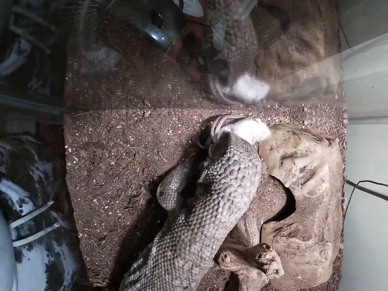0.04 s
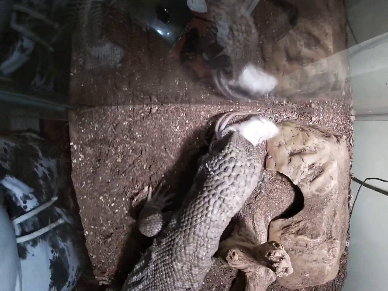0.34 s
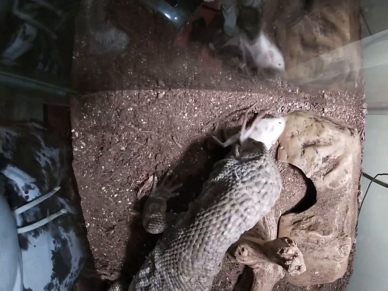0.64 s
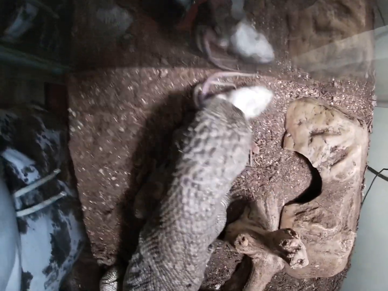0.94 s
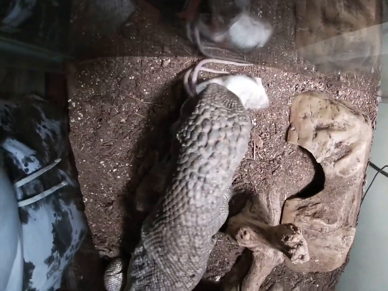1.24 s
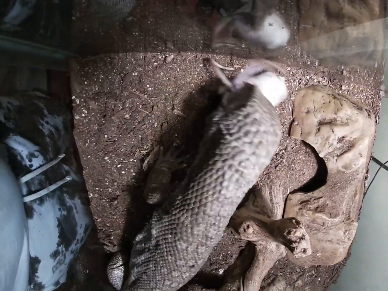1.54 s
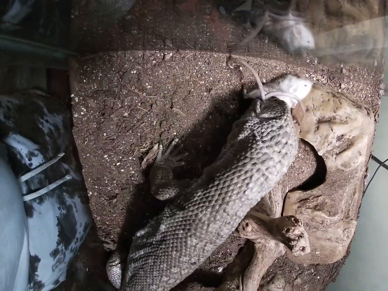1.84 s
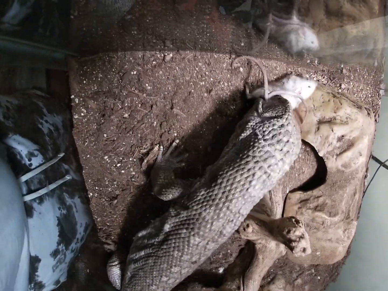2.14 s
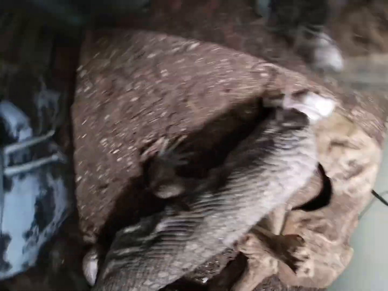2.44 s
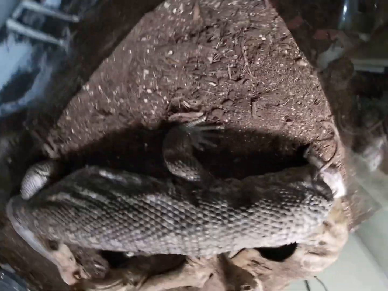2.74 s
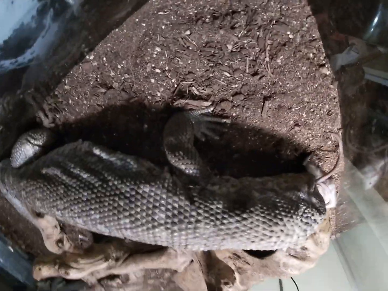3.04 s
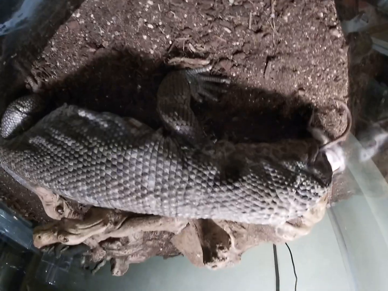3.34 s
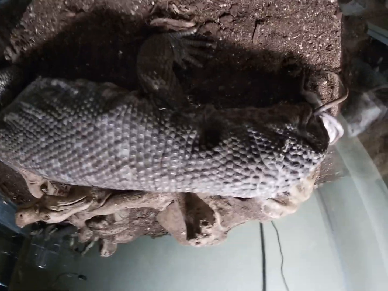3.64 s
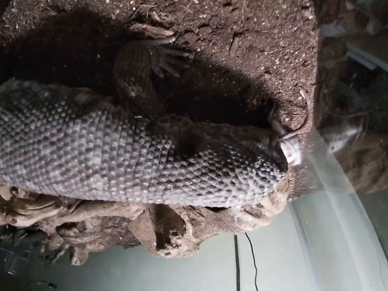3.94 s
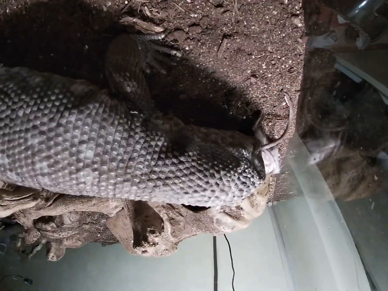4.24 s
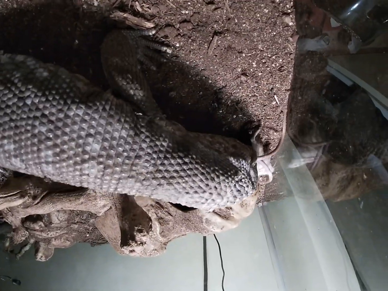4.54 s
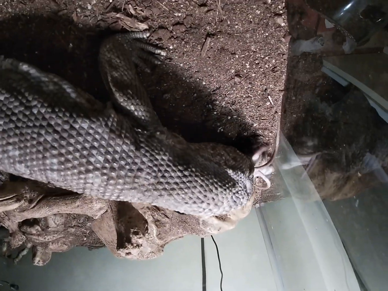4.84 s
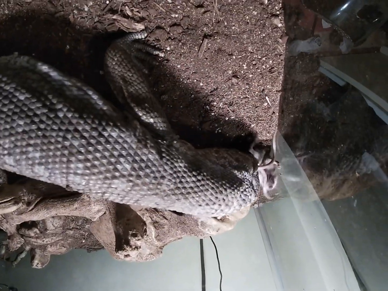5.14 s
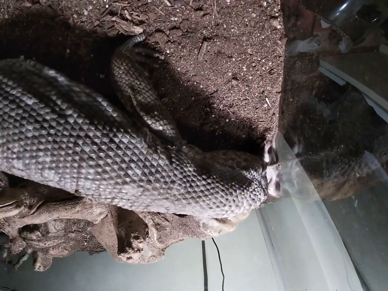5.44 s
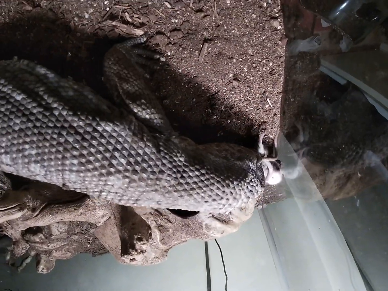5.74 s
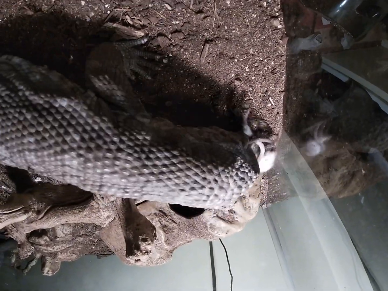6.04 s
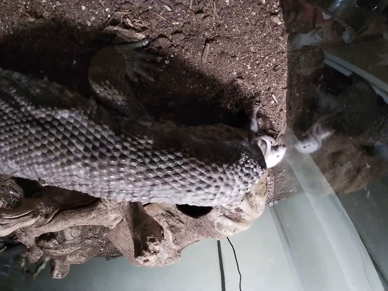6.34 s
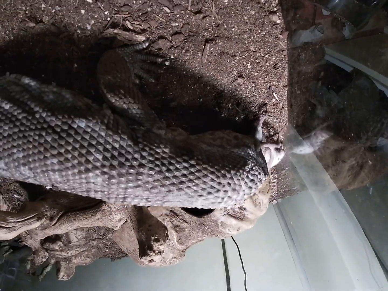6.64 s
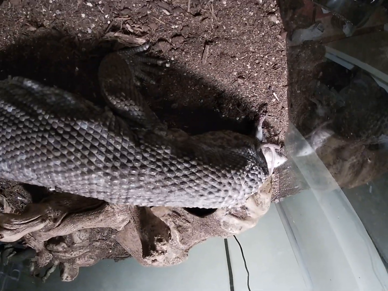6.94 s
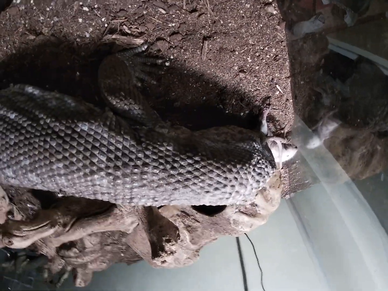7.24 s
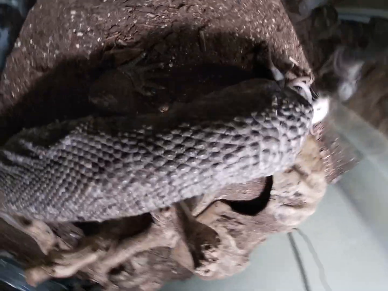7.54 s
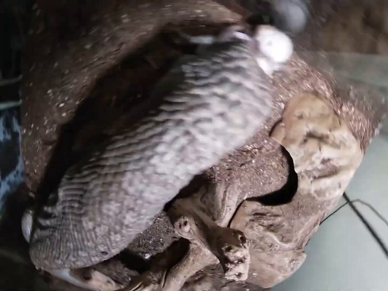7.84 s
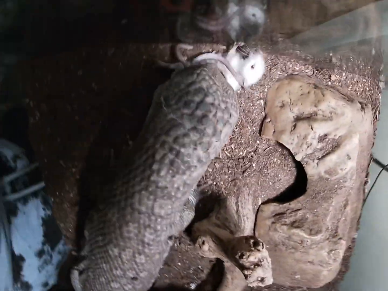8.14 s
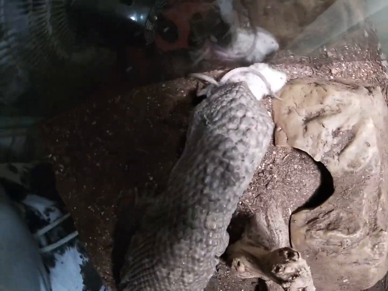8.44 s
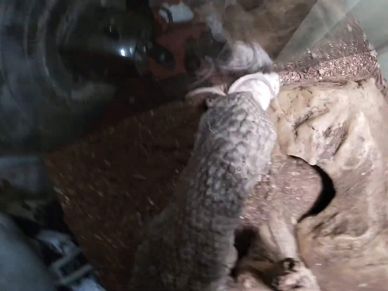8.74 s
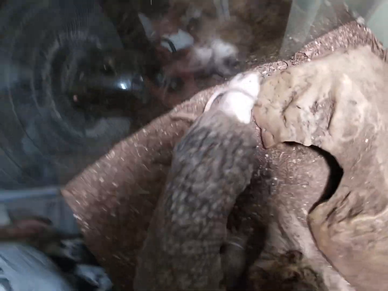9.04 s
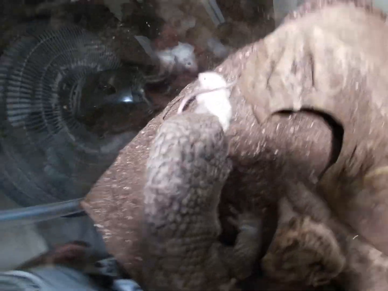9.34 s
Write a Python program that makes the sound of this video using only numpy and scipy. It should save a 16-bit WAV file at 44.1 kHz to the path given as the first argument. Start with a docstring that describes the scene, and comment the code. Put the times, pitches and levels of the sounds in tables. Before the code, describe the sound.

A mouse squeals in short, raspy bursts while a lizard scuffs over grit and knocks against a hollow glass tank, with microphone bumps.

```python
"""A mouse squeals nine times, in three bouts, held by a large lizard in a glass tank in a small hard room.
Each squeal starts as a soft whimper, then shoots up in pitch and breaks into a rasp.
The lizard shuffles over gritty soil and knocks against the hollow tank, which booms.
Fingers bump and rub a hand-held phone close to its microphone, over the faint noise of the room."""
import sys
import numpy as np
from scipy import signal
from scipy.fft import rfft, irfft, next_fast_len
from scipy.io import wavfile
from scipy.ndimage import uniform_filter1d, minimum_filter1d

SR = 44100
rng = np.random.default_rng(int(sys.argv[2]) if len(sys.argv) > 2 else 0)


def to_wav(s):
    """Save 16-bit WAV."""
    ch = np.atleast_2d(s).T  # columns
    pcm = np.round(np.clip(ch, -1, 1) * 32767)  # PCM
    wavfile.write(sys.argv[1], SR, pcm.astype(np.int16))


N = 422478
TIME = np.arange(N) / SR

# The notes the hollow tank rings at. Each row: pitch in Hz, width in Hz, gain in dB.
TANK_NOTES = [(125, 26, -18), (168.5, 10.2, 7.5), (289, 46, -10.5), (407.6, 39, -10.5)]
# The tone of a scraping claw. Each row: frequency in Hz, gain in dB.
SCRAPE_TONE = [(120, -27), (350, 15), (700, 4), (1200, 6), (1800, 5.5), (3600, 1), (5000, -6.5), (9000, -3),
               (13000, -89)]
# The hiss of fine grit or sliding skin. Each row: frequency in Hz, gain in dB.
HISS_TONE = [(1000, -5), (2500, -1), (3900, -2), (4800, -5), (6200, -1.5), (7800, -8.5), (9200, -10),
             (10800, -27), (13000, -27), (15000, -45)]


def squeal(t, lead_s, cry_s, low_hz, top_hz, rough, half, tilt_db, opening, rasp_db, climb_s, tire_db):
    """A soft sagging whimper swells, then the mouse pushes: the pitch shoots up and the voice breaks."""
    # How the throat and mouth shape the voice. Each row: frequency in Hz, gain in dB.
    throat = [(700, -30), (1020, -29), (1220, -11), (1700, -11.5), (2100, -9.5), (2600, -4.5), (3250, -4),
              (4350, -4.5), (5150, -18), (6500, -15), (7600, -20), (8900, -16.5), (10300, -34),
              (11800, -46), (15000, -50)]
    # A piercing ring that the second harmonic sweeps through. Each row: Hz, width in Hz, gain in dB.
    piercing_note = [(3270, 320, 7.5)]
    break_s, rattle_hz, flutter_hz = 0.056, 410, 135
    since_push = t - lead_s
    crying_s = np.maximum(since_push, 0)
    whimper = (np.minimum(since_push, 0) / lead_s) ** 2
    push = 1 - np.exp(-(crying_s / climb_s) ** 1.4)
    # The voice starts husky, clears on the climb and breaks up near the top.
    broken = np.clip(since_push / break_s, 0, 1) ** 2
    harsh = rough * (rough + (1 - rough) * broken) + 0.44 * whimper
    hz = low_hz * (1 + 0.15 * whimper) + (top_hz - low_hz) * push
    hz *= 1 - 0.0388 * (crying_s / cry_s) ** 4  # the pitch gives way as the cry runs out
    hz *= 1 + 0.0575 * harsh * wander(t, 1100) + 0.022 * wander(t, 219.1)
    # A slower vibration in the throat shakes the vocal folds and smears every harmonic.
    shake = np.sin(phase_of(rattle_hz * (1 + 0.1977 * wander(t, 149.6))))
    phase = phase_of(hz) + 0.95 * rough * harsh * shake
    # A wider mouth lifts the resonances.
    mouth = [(f * opening, db + tilt_db * np.log2(f / 3000)) for f, db in throat]
    # Under strain every other cycle differs, which adds tones halfway between the harmonics.
    harmonic = np.arange(1, 21)[:, None] / 2
    strength = np.where(harmonic % 1, half * (1 + push) / 2, 1) * gain_at(harmonic * hz, mouth)
    # The folds close softly in the whimper, so its overtones are weak.
    soft_db = -14 * (1 - gate(since_push, 1, 0.028, .01)) - 10 * whimper
    strength *= undb(soft_db * np.log2(.5 + harmonic) / 2)
    voice = np.sum(strength * np.sin(harmonic * phase), axis=0)
    rasp = undb(rasp_db + soft_db) * harsh * colour(rng.standard_normal(len(t)), mouth) / 2
    flicker_db = 5.5 * np.minimum(harsh, .7) * np.tanh(wander(t, 327.6))
    level = undb(flicker_db + tire_db * crying_s / cry_s - 6 * whimper)
    flutter = 1 + 0.4 * broken * np.sin(phase_of(flutter_hz * (1 + 0.255 * wander(t, 95.9))))
    sound = (voice + rasp) * flutter * level * gate(t, lead_s + cry_s, 0.67 * lead_s, 0.058)
    # The narrow ring builds before the voice breaks; then the open mouth rings with the second harmonic.
    pierce = ring(sound * (1 - broken ** 2), piercing_note)
    shrill = ring(sound * broken, [(2 * top_hz, top_hz / 2, 2)])
    return unit(sound + (1 - half) * (pierce + shrill))


def mouse():
    """The mouse cries again and again, each time with its own pitch and roughness."""
    # Each row: start of the climb, whimper length and cry length in seconds, low and top pitch in Hz,
    # level in dB, roughness and half-pitch share from 0 to 1, brightness in dB per octave,
    # mouth opening as a factor, rasp in dB, climb time in seconds, level change over the cry in dB.
    squeals = [(5.135, 0.04, 0.11, 1456, 1740, -26, 0.65, 0.88, -2, 0.96, 4, 0.015, -7.5),
               (5.368, 0.053, 0.085, 1226, 2075, -26, 0.71, 0.05, 1, 0.94, 1.5, 0.034, -10),
               (5.602, 0.058, 0.099, 1298, 2396, -28.5, 0.58, 0, -1, 1, 0, 0.04, -7),
               (5.837, 0.052, 0.09, 1299, 2298, -28.5, 0.64, 0.43, -1, 1.037, 0.5, 0.037, -2.5),
               (6.442, 0.06, 0.087, 1320, 2110, -25.5, 0.55, 0.03, 0, 0.97, -0.5, 0.037, -3),
               (6.678, 0.053, 0.097, 1274, 2200, -25.5, 0.53, 0, 0.5, 0.98, -7.5, 0.037, -6.5),
               (7.356, 0.046, 0.092, 1268, 1763, -25.5, 0.47, 0.1, 0.5, 0.9, -7, 0.034, -6.5),
               (7.61, 0.061, 0.091, 1236, 2332, -29, 0.6, 0.25, 0, 1, -4, 0.038, -6),
               (7.86, 0.064, 0.097, 1324, 2112, -30.5, 0.34, 0.3, 1.5, 1.012, 2, 0.028, -13.5)]
    out = np.zeros(N)
    for s, lead_s, cry_s, low_hz, top_hz, db, *timbre in squeals:
        t = TIME[:int((lead_s + cry_s + .02) * SR)]
        add(out, s - lead_s, undb(db) * squeal(t, lead_s, cry_s, low_hz, top_hz, *timbre))
    return out


def shoving_and_swaying():
    """The lizard's shoves boom the tank and shake its stand; the swinging phone adds a low rumble."""
    # Each row: time of the hardest push and length in seconds, relative boom and shudder in dB.
    shoves = [(0.04, 0.072, -35, -38.5), (0.128, 0.16, -40.5, -42.5), (0.462, 0.15, -34.5, -40.5),
              (0.56, 0.087, -31.5, -56), (0.778, 0.13, -39, -67), (0.859, 0.085, -30.5, -40),
              (1.167, 0.043, -35.5, -42), (1.231, 0.1, -31, -34), (1.297, 0.11, -34.5, -34.5),
              (1.629, 0.055, -37, -39.5), (2.298, 0.057, -28, -22.5), (2.436, 0.077, -35, -36.5),
              (2.549, 0.019, -33, -29), (2.763, 0.38, -46.5, -42), (3.06, 0.34, -40.5, -50),
              (3.491, 0.04, -37.5, -36.5), (3.79, 0.16, -41, -55), (4.182, 0.037, -42, -63),
              (5.113, 0.048, -41.5, -39.5), (6.123, 0.27, -47.5, -59.5), (7.673, 0.16, -36, -38),
              (7.83, 0.14, -33, -28), (7.933, 0.043, -38, -26.5), (8.001, 0.069, -33, -30.5),
              (8.942, 0.04, -24.5, -34.5), (9.182, 0.25, -30.5, -35), (9.54, 0.06, -28, -29.5)]
    # The hand swings the phone. Each row: fastest moment and length in seconds, relative level in dB.
    swings = [(1.1, 0.59, -50), (2.42, 0.42, -45.5), (2.82, 0.11, -38), (3.08, 0.32, -33.5),
              (3.45, 0.34, -47), (3.95, 0.5, -48.5), (7.39, 0.12, -44), (7.87, 0.39, -41),
              (8.51, 0.043, -37.5), (9.03, 0.4, -38.5), (9.52, 0.46, -35)]
    # The tone of the phone's rumble. Each row: frequency in Hz, gain in dB.
    rumble_tone = [(12, 5.5), (27, 5), (50, -6.5), (90, -5), (135, -12), (250, -25.5), (600, -61)]
    # The low note of the stand. Each row: pitch in Hz, width in Hz, gain in dB.
    stand_note = [(80.6, 27, 0)]
    fidget = undb(6 * np.tanh(wander(TIME, 15)))  # lizard and hand are never quite still
    boom_level = swells([(s, length, db) for s, length, db, _ in shoves]) + undb(-68.5) * fidget
    shudder_level = swells([(s, length, db) for s, length, _, db in shoves])
    sway_level = swells(swings) + undb(-67) * fidget
    rumble = steady(colour(rng.standard_normal(N), rumble_tone))
    sway = rumble * sway_level * undb(1 + 5.5 * wander(TIME, 25))
    pushes = colour(grains(400, 0.96), [(40, 15.0), (120, 2.5), (400, -12.5), (900, -15.5), (3000, -81)])
    boom = steady(ring(pushes, TANK_NOTES))
    shudder = steady(ring(ring(grains(400, 0.42), stand_note), stand_note))
    return sway + undb(-1) * (boom * boom_level + shudder * shudder_level)


def knocking(bite_s=0.00398):
    """A claw taps a hollow spot and scrapes briefly; its push rings the tank."""
    # Each row: time in seconds, relative scrape level in dB, scrape fade time in seconds,
    # frequency in Hz above which the scrape is dulled, relative boom in dB, hollow pitch in Hz.
    knocks = [(0.019, -34.5, .008, 5970, -45, 950), (0.934, -34, 0.009, 3980, -37.5, 940),
              (1.218, -30, 0.008, 5960, -38, 1340), (1.261, -30.5, 0.0065, 5000, -40, 1310),
              (1.294, -24.5, 0.0066, 1600, -31, 1090), (1.397, -35, 0.008, 8000, -38.5, 1320),
              (1.594, -29, 0.0075, 7100, -34.5, 1760), (2.593, -26, 0.0047, 5000, -35.5, 1090),
              (5.096, -32, 0.0078, 6000, -40.5, 2300), (7.799, -32.5, 0.021, 1200, -30.5, 670),
              (8.918, -16.5, 0.01, 3700, -25.5, 1670), (9.071, -34.5, 0.028, 900, -25, 800),
              (9.123, -32, 0.018, 2000, -21.5, 1330), (9.298, -29.5, 0.014, 1890, -22, 600)]
    scrapes, booms, t = np.zeros(N), np.zeros(N), TIME[:SR // 4]
    boom = ring(t * np.exp(-t / 0.002), TANK_NOTES)
    boom /= np.abs(boom).max()
    for s, db, fade_s, dull_hz, boom_db, hz in knocks:
        scrape = colour(rng.standard_normal(len(t)), SCRAPE_TONE)
        scrape = signal.lfilter(*signal.butter(2, dull_hz, fs=SR), scrape)
        scrape = unit(scrape + ring(scrape, [(hz, hz * 0.072, 7)])) * np.exp(-t / fade_s)
        tap = np.sin(2 * np.pi * hz * t) * np.exp(-t * hz / 2)
        add(scrapes, s - bite_s / 2, undb(db - 6) * scrape * gate(t, 1, bite_s, .01))
        add(booms, s, undb(db - 10) * tap + undb(boom_db + 4) * boom)
    return echoes(scrapes, glass_db=-15, glass_s=0.11, room_db=-9, room_s=0.13) + booms


def dragging():
    """Scales catch and slip on the soil in scuffs of changing tone; fine grit trickles."""
    # Each row: fastest moment and length in seconds, relative scuff and fine grit levels in dB.
    drags = [(0.064, 0.3, -52, -83), (0.466, 0.39, -50.5, -59), (1.014, 0.55, -51.5, -56.5),
             (1.66, 0.29, -58.5, -61), (2.277, 0.14, -45, -66), (2.441, 0.13, -61, -45),
             (2.561, 0.049, -42.5, -48), (2.683, 0.16, -50.5, -52.5), (2.864, 0.48, -54, -63),
             (3.134, 0.18, -45, -50.5), (4.36, 0.51, -64, -70), (5.047, 0.34, -60.5, -61.5),
             (7.087, 0.14, -63, -60), (7.315, 0.17, -56.5, -54), (8.38, 0.29, -63.5, -62.5),
             (8.855, 0.54, -59, -61), (9.157, 0.16, -51.5, -54.5), (9.57, 0.19, -54, -49.5)]
    # The tone of a scuff. Each row: frequency in Hz, gain in dB.
    scuff_tone = [(120, 0), (300, 11.5), (600, 1), (1200, 3.5), (2000, 0), (3500, -6), (5000, -25.5),
                  (9000, -52)]
    catch = undb(1.5 * wander(TIME, 35))
    scuff = shifting_tone(colour(grains(1500, 1.15), scuff_tone), depth_db=0.5, rate=22)
    grit = colour(grains(9000, 0.78), HISS_TONE)
    scuff_level = swells([(s, length, db) for s, length, db, _ in drags])
    grit_level = swells([(s, length, db) for s, length, _, db in drags]) + undb(-88)
    return catch * (scuff * scuff_level + undb(-1) * grit * grit_level)


def sweeping():
    """The lizard's side slides over the soil with a dull swish; long slides start gently."""
    # Each row: start and length in seconds, centre frequency in Hz, level in dB.
    sweeps = [(0.34, 0.07, 313, -47), (0.566, 0.14, 2270, -61.5), (2.081, 0.073, 1490, -48.5),
              (2.147, 0.082, 1530, -45.5), (2.388, .1, 980, -51), (2.659, 0.285, 2140, -58.5),
              (3.12, 0.089, 975, -43), (5.091, 0.074, 284, -48), (6.016, 0.17, 396, -56),
              (7.062, 0.2, 1120, -58), (9.398, 0.032, 3120, -54)]
    out = np.zeros(N)
    for s, length, hz, db in sweeps:
        t = TIME[:int((length + .04) * SR)]
        band = ring(rng.standard_normal(len(t)), [(hz, hz * 0.43, 0)])
        swish = unit(ring(band, [(hz, 2 * hz, 0)]))
        add(out, s, swish * undb(db + 1.1 * wander(t, 61.5)) * gate(t, length, length / 10, 0.014))
    return out


def scratching(hz=2100):
    """A claw ploughs a few grains, each time with a slightly different ring."""
    # Each row: start in seconds, level at its loudest in dB, seconds to get there.
    scratches = [(0.061, -51, 0.0024), (0.093, -51.5, 0.0058), (0.335, -51, 0.0045), (0.423, -47.5, .004),
                 (0.473, -50, 0.0026), (0.492, -49.5, 0.0026), (0.548, -47, 0.0024), (1.177, -47, 0.0053),
                 (2.105, -38.5, 0.0016), (2.155, -40, 0.0038), (2.237, -41, 0.0045), (3.499, -54, 0.0066),
                 (3.69, -54.5, 0.007), (3.725, -50, 0.0095), (3.753, -57, 0.0074), (3.816, -52, 0.0074),
                 (4.138, -56, 0.0048), (4.159, -57, 0.0034), (9.021, -52, 0.0081)]
    out, t = np.zeros(N), TIME[:SR // 10]
    for s, db, peak_s in scratches:
        grit = colour(rng.standard_normal(len(t)) ** 3, SCRAPE_TONE)
        ring_hz = hz * np.exp(0.48 * rng.standard_normal())
        grit += ring(grit, [(ring_hz, ring_hz / 2, 6)])
        grit = steady(ring(grit, [(hz, 2 * hz, 0)]), span_s=.006)
        add(out, s, undb(db) * grit * t / peak_s * np.exp(1 - t / peak_s))
    return out


def tapping(contact_s=0.0023):
    """A light touch rings a glass pane of the tank."""
    # Each row: start in seconds, relative level in dB.
    taps = [(4.211, -56), (4.229, -48.5), (4.433, -46.5), (4.602, -61), (4.877, -54.5), (6.264, -52.5),
            (7.226, -44.5)]
    # The notes of the pane. Each row: pitch in Hz, width in Hz, gain in dB.
    pane_notes = [(886, 196, 7), (2300, 780, -7), (3400, 500, -5)]
    out, t = np.zeros(N), TIME[:SR // 10]
    for s, db in taps:
        touch = rng.standard_normal(len(t)) * np.exp(-t / contact_s)
        tap = ring(ring(touch, pane_notes), pane_notes)
        add(out, s, 2 * undb(db) * tap / np.abs(tap).max())
    return out


def finger_bumps(pad_s=0.00069, flex_hz=150, flex_s=0.0043, thump_lag_s=0.00303):
    """A fingertip lands by the microphone: a click, a dull thud, a flex of the case and a deep thump."""
    # Each row: time in seconds; the thump's dB, Hz and fade in seconds; the click's dB, fade in seconds
    # and brightness in dB per octave; relative thud in dB; softness in seconds; case flex in dB.
    bumps = [(2.249, -13.5, 36.2, 0.042, -18, 0.0018, 2, -25.5, 0.00026, -23),
             (2.2803, -24, 70, 0.0055, -51, .002, -3, -21.5, 0.00033, -30),
             (2.3738, -37, 110, 0.0043, -55, .002, -1, -24, 0.00037, -19.5),
             (2.411, -33, 105, 0.01, -55, .002, -6, -30, 0.00027, -33.5),
             (2.875, -38, 60, 0.015, -37.5, 0.0026, 3, -47, 0.006, -55),
             (2.999, -15.5, 54.6, 0.015, -14, 0.0018, 2, -26.5, 0.00016, -6.5),
             (3.287, -15.5, 53, 0.016, -44, 0.0048, 7, -20.5, 0.0035, -9),
             (3.359, -10, 50, 0.015, -42.5, 0.0062, 3.5, -23.5, 0.0042, -16),
             (3.978, -28.5, 45.5, 0.065, -38, 0.0021, 0.5, -41, 0.0017, -48),
             (7.089, -83, 60, 0.0037, -41.5, 0.002, 13, -51, 0.00017, -80)]
    # The tone of the click. Each row: frequency in Hz, gain in dB.
    click_tone = [(400, -26), (1500, 6.5), (3400, 12), (4700, 5), (6200, 7), (8000, -1), (10500, -12),
                  (15000, -47)]
    # The tone of the thud. Each row: frequency in Hz, gain in dB.
    thud_tone = [(50, -45), (160, 7.5), (300, 3.5), (460, -6), (680, -13), (1150, -7.5), (2200, -22),
                 (9000, -30.5)]
    out, t = np.zeros(N), TIME[:SR // 4] - .02
    before, after, late = np.minimum(t, 0), np.maximum(t, 0), np.maximum(t - thump_lag_s, 0)
    for s, thump_db, hz, thump_s, click_db, click_s, tilt_db, thud_db, soft_s, flex_db in bumps:
        noise = rng.standard_normal((2, len(t)))
        onset = np.exp(-(before / soft_s) ** 2)
        thump = -np.sin(2 * np.pi * hz * late) * np.exp(-late / thump_s)
        flex = np.sin(2 * np.pi * flex_hz * after) * np.exp(-after / flex_s)
        tilted_tone = [(f, db + tilt_db * np.log2(f)) for f, db in click_tone]
        click = colour(noise[0], tilted_tone) * np.exp(-after / click_s)
        # Only a hard landing gives the sharp push of the finger pad.
        pad = -undb(3) * np.exp(-(t / pad_s) ** 2) / (1 + soft_s / pad_s / 2)
        thud = pad + undb(-3) * colour(noise[1], thud_tone) * np.exp(-after / (0.38 * thump_s))
        contact = onset * (undb(click_db) * click + undb(thud_db) * thud)
        add(out, s + t[0], undb(thump_db) * thump + undb(flex_db) * flex + contact)
    return out


def finger_rubs(lift_s=0.036):
    """Sliding skin hisses, rasps and rings the phone case."""
    # Each row: start, length and time to full pressure in seconds, then hiss, case ring and rasp in dB.
    rubs = [(2.267, 0.23, 0.026, -49, -60, -52), (2.517, 0.074, 0.014, -47.5, -60, -65),
            (2.864, 0.048, .01, -52, -62, -72), (3.016, 0.022, 0.013, -40.5, -38, -45),
            (3.043, 0.052, 0.039, -39.5, -63, -42.5), (3.118, 0.093, 0.018, -52.5, -48.5, -60),
            (9.117, 0.032, 0.019, -49.5, -49, -64), (9.157, 0.087, 0.074, -40, -35, -46.5),
            (9.432, 0.014, .007, -49, -33.5, -41), (9.493, 0.072, .018, -42, -33.5, -34)]
    # The notes of the case. Each row: pitch in Hz, width in Hz, gain in dB.
    case_notes = [(497, 94, 4.5), (1280, 100, 4), (2500, 530, 2)]
    # The rasp of skin on the case. Each row: centre in Hz, width in Hz, gain in dB.
    rasp_band = [(3880, 1040, 0)]
    out = np.zeros(N)
    slips = grains(5000, 0.72) * undb(1.1 * wander(TIME, 80))
    hiss = colour(slips + ring(slips, [(6400, 1500, -1)]), HISS_TONE)
    case = colour(ring(slips, case_notes), [(200, 29.5), (4200, -5.5), (9000, 14), (12000, -53)])
    rasp = unit(ring(ring(slips, rasp_band), rasp_band))
    for s, length, press_s, hiss_db, case_db, rasp_db in rubs:
        near = (TIME > s) & (TIME < s + 2 * length)
        rub = undb(hiss_db) * hiss[near] + undb(case_db) * case[near] + undb(rasp_db) * rasp[near]
        out[near] += rub * gate(TIME[near] - s, length, press_s, lift_s)
    return out


def rising_tones():
    """Short low tones rise in pitch: the brief ones are hollow knocks, the longer ones creaks."""
    # Each row: start and length in seconds, first and last pitch in Hz, peak level in dB.
    tones = [(2.104, 0.018, 302, 358, -32), (2.25, 0.02, 442, 478, -25.5),
             (2.775, 0.077, 172.5, 182, -31.5), (2.94, 0.073, 152, 207, -33),
             (3.005, 0.02, 370, 415, -21.5)]
    out = np.zeros(N)
    for s, length, start_hz, end_hz, db in tones:
        t = TIME[:int(length * SR)]
        add(out, s, undb(db) * np.sin(np.pi * t / length) * signal.chirp(t, start_hz, length, end_hz))
    return out


def echoes(x, glass_db, glass_s, room_db, room_s, treble_share=1.0):
    """Sound bounces between the panes and around the room, fading 60 dB in glass_s and room_s."""
    t = TIME[:SR * 2 // 3]
    noise = rng.standard_normal((2, len(t)))
    panes = noise[0] * (rng.random(len(t)) < .03) * undb(-60 * t / glass_s) * (t > .001)
    low = signal.sosfiltfilt(signal.butter(2, 4500, fs=SR, output="sos"), noise[1])
    treble = noise[1] - low
    fade_db = -60 * t / room_s
    walls = low * undb(fade_db) + treble * undb(fade_db / treble_share)  # below 1, treble dies sooner
    walls *= gate(t - .005, 1, 0.0027, .01)
    response = undb(glass_db) * panes / np.linalg.norm(panes)
    response += undb(room_db) * walls / np.linalg.norm(walls)
    response[0] += 1  # the direct sound
    return signal.fftconvolve(x, response / np.linalg.norm(response))[:N]


def room_noise():
    """The quiet room gives a faint, steady rumble and hiss."""
    # Each row: frequency in Hz, gain in dB.
    room_tone = [(15, -50), (25, 10.5), (53, 9.5), (110, -18.5), (178, 4), (297, -12.5), (399, -3.5),
                 (537, -27), (741, -6), (1450, -18), (1660, -18), (5430, -22.5), (8810, -25), (15500, -44)]
    return undb(-63) * colour(rng.standard_normal(N), room_tone)


def undb(db):
    """Turn decibels into a gain."""
    return 10 ** (np.asarray(db) / 20)


def unit(x):
    """Scale x to an average strength (rms) of 1."""
    return x / np.sqrt(np.mean(x ** 2))


def add(track, s, x):
    """Mix x into the track at s seconds."""
    i = max(int(s * SR), 0)
    track[i:i + len(x)] += x[:max(N - i, 0)]


def phase_of(hz):
    """Add up a changing pitch into the angle of its wave."""
    return 2 * np.pi * np.cumsum(hz) / SR


def gain_at(hz, points):
    """Read a gain from a curve of (Hz, dB) points; silent above the last one."""
    f, db = np.transpose(points)
    return undb(np.interp(np.log(hz + 1e-6), np.log(f), db, right=-np.inf))


def colour(x, points):
    """Shape the tone of x with a curve of (Hz, dB) points, at strength 1."""
    size = next_fast_len(len(x))
    gains = gain_at(np.fft.rfftfreq(size, 1 / SR), points)
    return unit(irfft(rfft(x, size) * gains, size)[:len(x)])


def ring(x, notes):
    """Let x ring at several (Hz, width in Hz, dB) notes at once."""
    return sum(undb(db) * signal.lfilter(*signal.iirpeak(hz, hz / width, SR), x)
               for hz, width, db in notes)


def wander(t, rate):
    """Drift at random by about 1 either way, with rate steps a second."""
    steps = rng.standard_normal(len(t) // 10)
    return 1.145 * np.interp(t * rate, np.arange(len(steps)), steps)


def grains(rate, spread_db):
    """Tiny slips of uneven size, about rate of them a second."""
    hit = rng.random(N) < rate / SR
    return hit * rng.standard_normal(N) * undb(spread_db * np.minimum(rng.exponential(size=N), 4))


def gate(t, length, rise, fall):
    """Fade in from time 0 and fade out around length."""
    return np.sin(np.pi / 2 * np.clip(t / rise, 0, 1) * np.clip((length - t) / fall + .5, 0, 1)) ** 2


def swells(rows, rise_share=0.49, roundness=1.19):
    """Strength over time of movements (peak time, length, dB) that gather speed and die away."""
    power = np.zeros(N // 64 + 1)
    t = np.linspace(0, N / SR, len(power))
    for s, length, db in rows:
        from_peak = np.maximum((s - t) / rise_share, (t - s) / (1 - rise_share)) / length
        power += (undb(db) * np.exp(-from_peak ** roundness)) ** 2
    return np.interp(TIME, t, np.sqrt(power))


def steady(x, span_s=0.037):
    """Hold x near strength 1 over every short span."""
    power = uniform_filter1d(x ** 2, size=int(span_s * SR))
    return unit(x / np.sqrt(uniform_filter1d(power, size=1024) + np.mean(power) / 20))


def shifting_tone(x, depth_db, rate):
    """Let each octave of x swell and sink on its own, as the contact changes."""
    size = next_fast_len(N)
    spectrum = rfft(x, size)
    octave = np.log2(np.fft.rfftfreq(size, 1 / SR).clip(250, 8000) / 250)
    bands = (irfft(spectrum * np.maximum(1 - abs(octave - k), 0), size)[:N] for k in range(6))
    return unit(sum(band * undb(depth_db * wander(TIME, rate)) for band in bands))


def scene():
    """Mix the animals in the tank, the hand on the phone and the quiet room into one channel."""
    cries = echoes(mouse(), glass_db=1.5, glass_s=0.021, room_db=3.5, room_s=0.46, treble_share=0.79)
    movement = shoving_and_swaying() + dragging() + sweeping() + knocking() + scratching() + tapping()
    air = room_noise()
    return (undb(-2) * cries + movement + finger_bumps() + finger_rubs() + rising_tones() + air)[None]


def record(dry):
    """The phone's limiter turns down the hardest bumps, and the highest treble is cut."""
    ceiling, top_hz = .29, 15700
    needed_gain = np.minimum(1, ceiling / (np.abs(dry) + 1e-9))
    gain = uniform_filter1d(minimum_filter1d(needed_gain, size=201), size=201)
    return signal.sosfilt(signal.ellip(8, .2, 70, top_hz, fs=SR, output="sos"), dry * gain)


dry = scene()
out = record(dry)
to_wav(out)
```